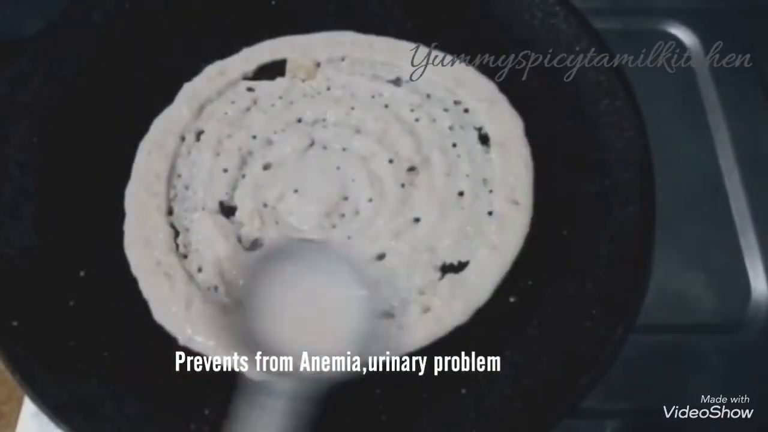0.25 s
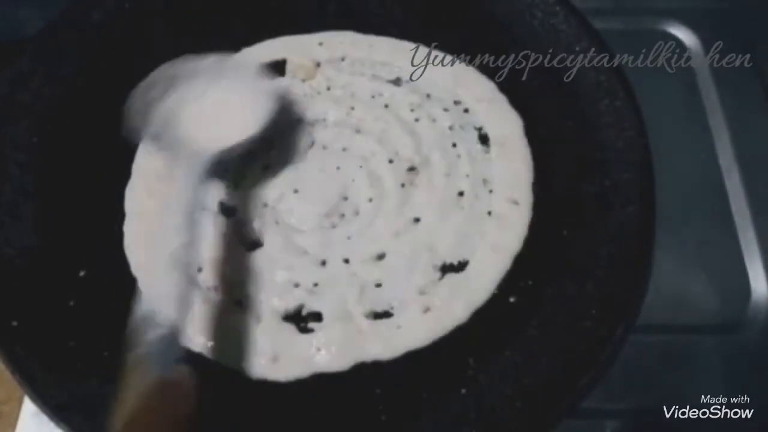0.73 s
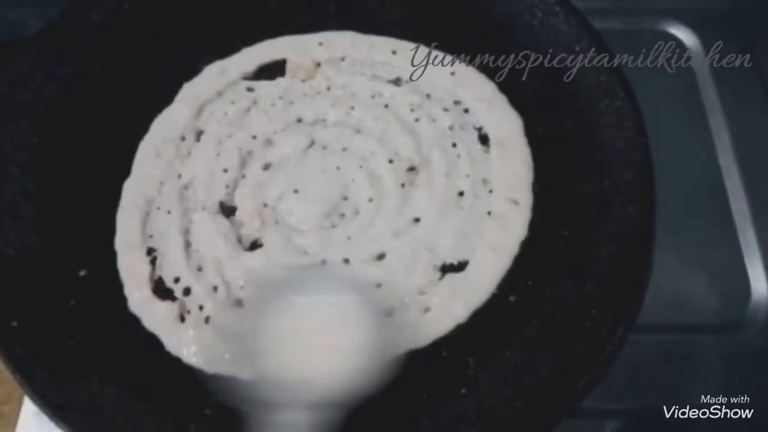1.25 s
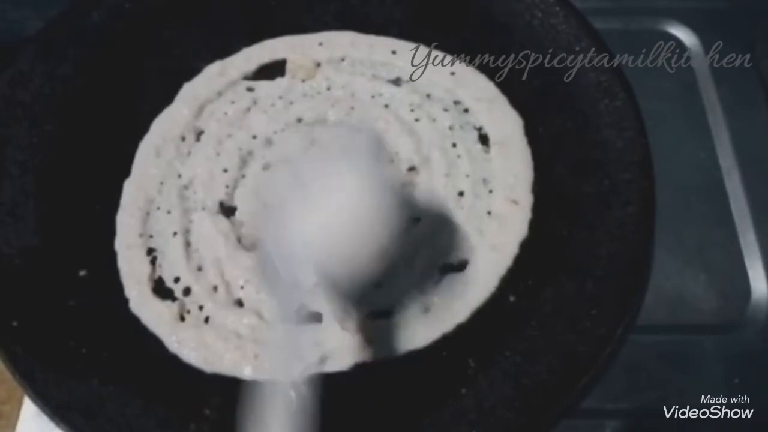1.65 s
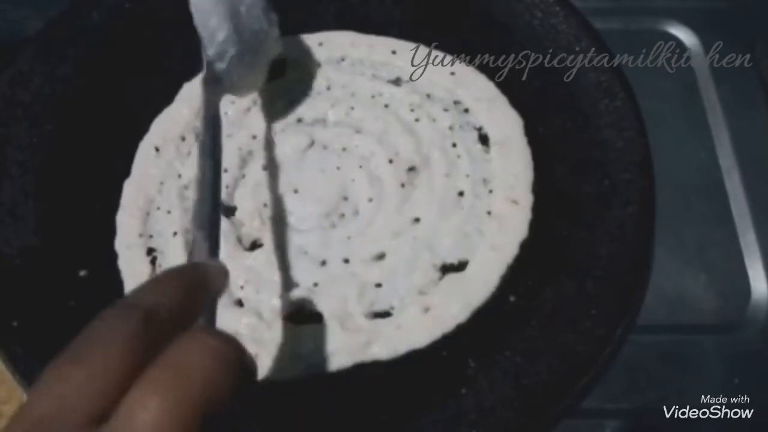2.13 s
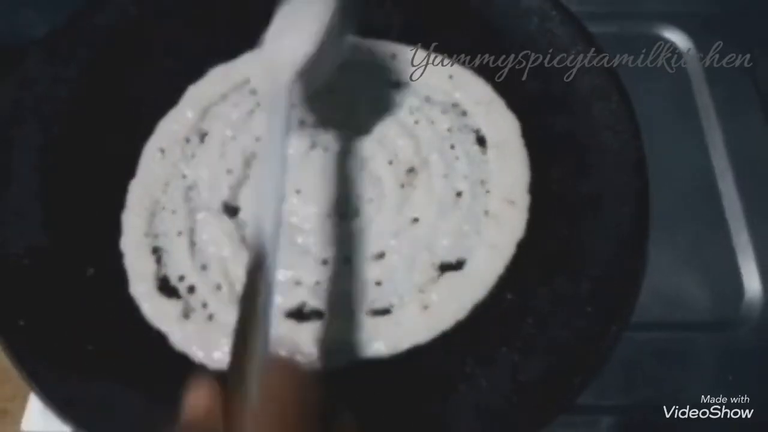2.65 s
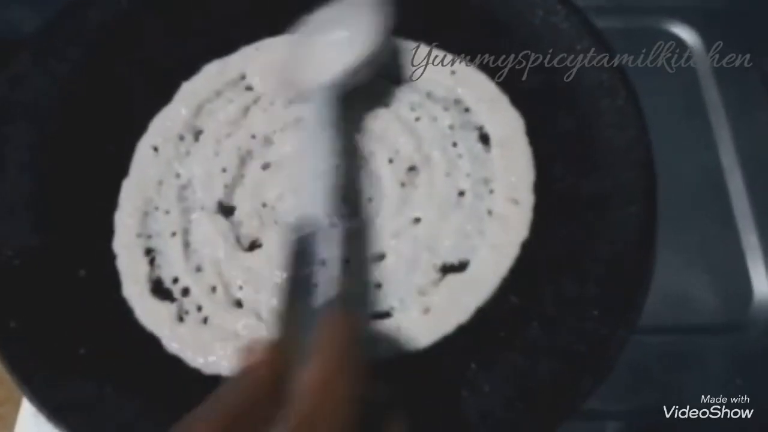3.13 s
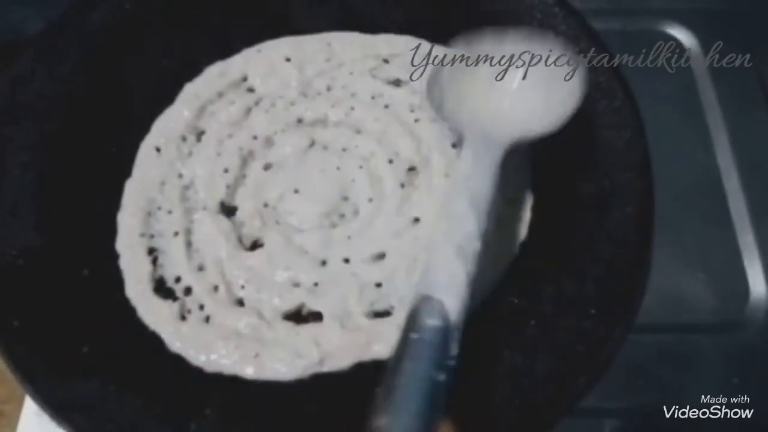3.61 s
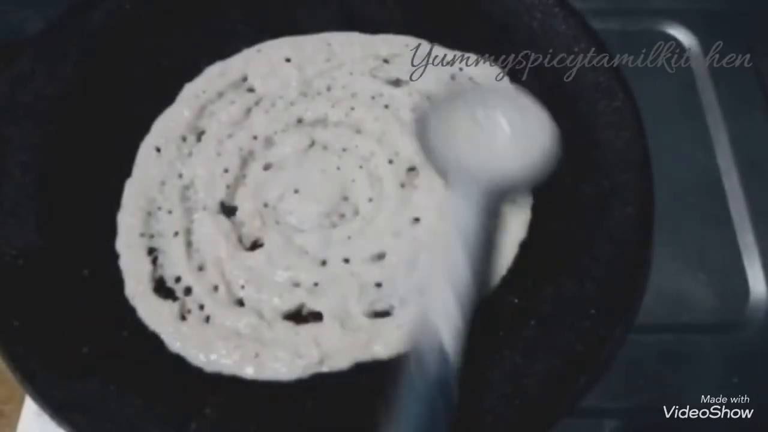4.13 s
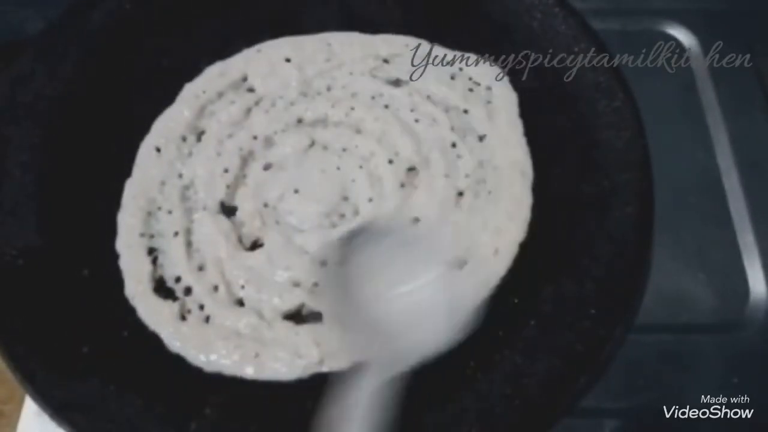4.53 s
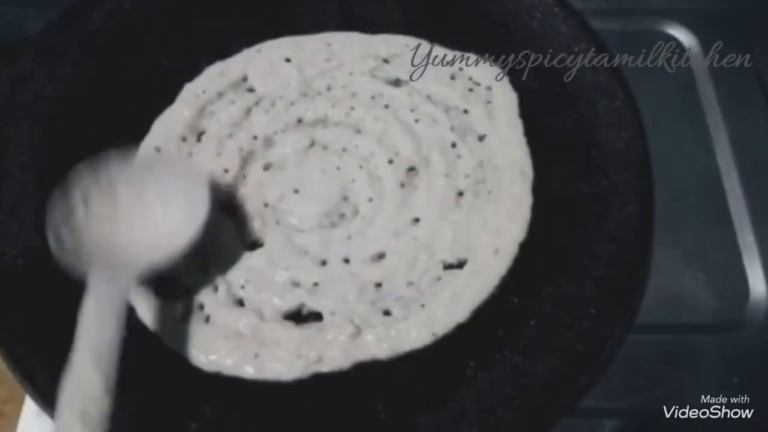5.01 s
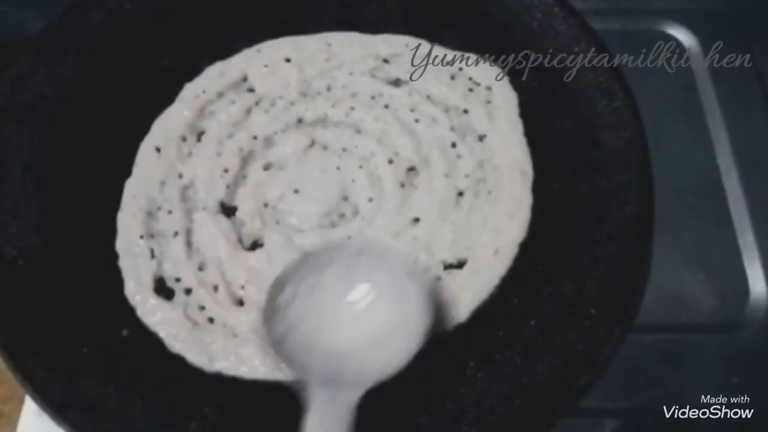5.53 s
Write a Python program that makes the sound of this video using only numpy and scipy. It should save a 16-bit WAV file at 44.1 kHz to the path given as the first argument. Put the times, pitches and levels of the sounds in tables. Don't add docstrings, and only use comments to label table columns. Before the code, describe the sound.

Close, steady sizzle of thin batter on a hot pan, crackling with sharp pops, gradually sinking, briefly revived near four seconds, then dying down.

```python
import sys
import numpy as np
from scipy import signal
from scipy.fft import rfft, irfft, next_fast_len
from scipy.io import wavfile

SR = 44100
rng = np.random.default_rng(int(sys.argv[2]) if len(sys.argv) > 2 else 0)


def store_pcm(level_fs):
    pcm = np.round(np.clip(level_fs, -1, 1) * 32767).astype(np.int16)
    wavfile.write(sys.argv[1], SR, np.atleast_2d(pcm).T)


def volts_from_db(level):
    exponent = np.asarray(level, float) / 20
    return 10 ** exponent


N = 254400
TIME = np.arange(N) / SR

# time in seconds, level in dB, fineness of the bubbles from -1 to 1.
SIZZLE = [(0, -36, -0.78), (.55, -35.5, -0.082), (1.2, -36.5, -0.085), (1.7, -39.5, -1.3), (2.0, -37, 0.75),
          (2.3, -39.5, -0.45), (2.9, -39.5, -0.76), (3.2, -41, -0.038), (3.6, -43, -0.66),
          (3.9, -45, -0.99), (4.15, -43.5, -0.57), (4.35, -39, 0.84), (4.7, -41.5, 0.0056), (5.05, -41, 1),
          (5.35, -42.5, -0.058), (5.74, -46.5, -0.87), (5.77, -54, -0.15)]
SIZE_HZ = [
    1300,
    2800,
    6000,
    12000,
]
SIZE_DB = [0.56, 0.7, 0, 0.75]
SIZE_FINE_DB = [-1.5, -3, 2, -3]
OIL_SIZE_DB = [-1.5, 1.6, 0.1, 0.5]
# middle in seconds, length in seconds, depth in dB.
LULLS = [(.291, .026, -2.5), (1.672, 0.047, -1.5), (1.928, 0.023, -3.5), (2.527, 0.013, -3.5),
         (2.864, 0.23, -3.5), (3.088, 0.036, -2.5), (3.397, 0.0066, -15.5), (3.456, 0.01, -12),
         (3.677, 0.1, -4.5), (3.91, 0.013, -6.5), (3.938, 0.0093, -19), (3.999, 0.051, -3.5),
         (4.089, 0.016, -7), (4.196, 0.021, -6), (4.817, 0.0066, -7), (4.922, 0.024, -4),
         (5.223, 0.016, -5), (5.245, 0.0072, -25), (5.322, 0.009, -10), (5.555, 0.01, -8),
         (5.642, 0.0089, -3)]
# middle in seconds, length in seconds, rise in dB.
SPURTS = [(0.161, 0.0049, 0), (0.646, 0.042, 1.5), (1.766, 0.023, 3.5), (2.0, 0.024, -1), (2.717, 0.04, 3),
          (3.207, 0.043, 2.1), (3.772, 0.036, 4.5), (3.964, 0.008, 7), (4.049, 0.026, 2.5),
          (4.44, 0.053, 1), (4.587, 0.013, 4.5), (4.709, 0.037, 3.5), (5.056, 0.047, 3),
          (5.491, 0.18, -0.5), (5.681, 0.13, 1.5), (5.737, 0.0068, 3)]
# middle in seconds, half length in seconds, pitch in Hz, width in Hz, boost in dB.
VENTS = [(0.04, .1, 3730, 400, 3), (.45, 0.058, 6000, 900, 5.5), (.65, 0.084, 6300, 900, 4.5),
         (1.303, 0.13, 6600, 400, 3.5), (1.8, 0.11, 6440, 400, 1), (2.198, 0.12, 6650, 400, 2),
         (1.127, 0.18, 4560, 400, 2.5), (1.276, 0.12, 2270, 400, 6), (1.38, 0.11, 3680, 300, 4),
         (1.497, 0.22, 9700, 500, 4), (1.6, 0.14, 10400, 500, 2), (1.58, .12, 7800, 400, 0),
         (1.993, .07, 5460, 1780, 5.5), (2.283, 0.08, 2830, 300, 5.5), (2.693, 0.13, 2900, 300, 4),
         (3.207, 0.19, 6700, 400, 4.5), (3.643, 0.11, 1140, 400, 7), (3.898, 0.1, 8400, 500, 6),
         (4.484, 0.18, 3270, 250, 5), (4.854, 0.36, 3270, 250, 5.5), (4.65, 0.37, 2230, 450, 4.5),
         (5.556, 0.16, 3550, 300, 5)]
# time in seconds, peak in dB, pitch in Hz.
POPS = [(0.156, -18, 7100), (0.161, -21, 4000), (0.7352, -22.5, 6500), (1.1697, -33, 6290),
        (1.4661, -20.5, 3680), (1.6202, -20.5, 5950), (1.9699, -21, 5360), (2.0232, -21, 5250),
        (2.791, -21.5, 5450), (2.8125, -20.5, 5590), (2.8539, -21, 6400), (3.3246, -23, 5980),
        (3.371, -24, 4880), (3.4072, -23, 3980), (3.5975, -19.5, 6510), (3.6463, -21.5, 4540),
        (3.7525, -22, 6670), (3.782, -26, 1470), (3.8052, -25, 5870), (3.9579, -28, 4120),
        (4.0238, -27, 7190), (4.0423, -24, 3370), (4.2206, -23, 6040), (4.5136, -22, 3260),
        (4.9541, -25.5, 5800), (4.9935, -26, 3270), (5.0424, -21.5, 6240), (5.1602, -21, 6540),
        (5.2065, -20.5, 5920), (5.666, -26, 2500)]
# frequency in Hz, level in dB per Hz.
COLOUR = [(180, -25), (300, -21), (500, -13), (700, -8.5), (850, -10.5), (1230, -10.5), (1400, -4),
          (1950, -4), (2400, -2.5), (4000, -2.5), (6600, 0), (8000, -9.5), (12900, -14)]
# frequency in Hz, width in Hz, boost in dB.
PAN_MODES = [(840, 26, 5), (945, 20, 8.5), (1310, 80, 2), (3680, 190, 0.5), (5300, 47, 0)]
# frequency in Hz, gain in dB.
MIC_PORT = [(12900, 0), (13150, -2.5), (13950, -2.5), (14700, 5), (15800, 4)]
# frequency in Hz, level in dB per Hz.
RUMBLE = [(12, -34), (20, -2), (59, -4.5), (103, 1.5), (172, -1), (203, -1), (349, -5.5), (513, -5),
          (600, 0.5), (780, -39), (1320, -120)]
# start in seconds, length in seconds, level in dB.
FLUTTERS = [(0.016, .07, -66), (.16, 0.11, -61), (.41, .055, -78), (0.764, 0.25, -75), (1.24, .1, -65),
            (1.37, .1, -64), (1.5, .1, -64), (1.825, .045, -74), (2.06, .045, -65.5), (2.17, 0.082, -63),
            (2.675, .04, -68), (2.32, .1, -65), (2.5, .1, -63), (2.835, .09, -62), (3.483, 0.11, -66),
            (3.7, .064, -64), (4.163, 0.045, -70), (4.353, .056, -64), (4.57, .08, -60),
            (5.073, 0.072, -64), (5.26, 0.11, -63), (5.473, .05, -61), (5.698, .035, -67)]
# frequency in Hz, level in dB.
FLARE = [(150, -59), (520, -68)]
# frequency in Hz, level in dB rms.
HUM = [(200, -78.5)]


def boil(per_s=2600, spread_db=2.5, clump_db=0.5, size_clump_db=2.0, hiss_db=-3.0, count=22):
    shared_db = clump_db * wander(166)
    oiled = np.clip((TIME - 4.22) / 0.098, 0, 1)
    fineness = curve(SIZZLE, 2)
    shares_db = np.array([db + fine_db * fineness + oil_db * oiled
                          for db, fine_db, oil_db in zip(SIZE_DB, SIZE_FINE_DB, OIL_SIZE_DB)])
    sunk_db = curve(SIZZLE, 1) - SIZZLE[0][1]
    busy = volts_from_db(1.2 * sunk_db)
    hiss = volts_from_db(hiss_db + 0.26 * sunk_db)
    out = np.zeros(N)
    for pitch_hz in np.geomspace(500, 20000, count):
        when, size = rng.random((2, N))
        strength = volts_from_db(spread_db * np.minimum(-np.log(size + 1e-9), 4.2))
        clicks = evened(strength * (when < busy * per_s / count / SR) / np.sqrt(busy))
        nearness = np.exp(-(np.log2(pitch_hz / np.array(SIZE_HZ)) / 0.9) ** 2)
        surge = volts_from_db(shared_db + size_clump_db * wander(37) + nearness @ shares_db)
        pulse = burst(pitch_hz, 11.0, 0.3)
        ringing = echoed(pulse, rng.standard_normal(3000), -2.0, -9.5, 0.13)
        out += signal.oaconvolve(clicks * surge, ringing)[:N]
        out += signal.oaconvolve(hiss * rng.standard_normal(N) * surge, pulse)[:N]
    return volts_from_db(sizzle_db()) * evened(out)


def vents(x, small_db=5, small_s=.06, small_width=.025, count=320):
    place, pitch = rng.random((count, 2)).T
    small = [(s, small_s, hz, small_width * hz, small_db)
             for s, hz in zip(place * N / SR, 900 * 16 ** pitch)]
    out = x.copy()
    for s, length, hz, width, db in VENTS + small:
        span = slice(max(round((s - length) * SR), 0), round((s + length) * SR))
        opening = np.cos(np.pi / 2 * (TIME[span] - s) / length) ** 2
        ring = signal.lfilter(*signal.iirpeak(hz, hz / width, SR), x[span])
        out[span] += (volts_from_db(db) - 1) * opening * ring
    return out


def pops(spray_s=0.0029, spray_db=-19.5, count=50):
    out = np.zeros(N + 8192)
    t = np.arange(2000) / SR
    level_db = sizzle_db() + 11
    low_hz, high_hz = 2500, 7000
    small = []
    for place, loudness, pitch in rng.random((count, 3)):
        s = .01 + 5.7 * place
        db = level_db[int(s * SR)] + 2 * loudness - 1
        small.append((s, db, low_hz * (high_hz / low_hz) ** pitch))
    chance = rng.standard_normal((len(POPS + small), 3, len(t)))
    for (s, db, pitch_hz), (size, gate, room) in zip(POPS + small, chance):
        drive = volts_from_db(spray_db) * abs(size) * (gate > 1.5) * np.exp(-t / spray_s)
        drive[0] = 1
        pop = signal.fftconvolve(drive, echoed(burst(pitch_hz, 4.2, 0.2), room, -4.5, -4.5, 0.11))
        at = round((s - .0004) * SR)
        out[at:at + len(pop)] += volts_from_db(db + 1.5) * pop / abs(pop).max()
    return out[:N]


def steady_hiss():
    return volts_from_db(-60.0) * evened(signal.oaconvolve(rng.standard_normal(N), burst(9000, 12.0, 1.0))[:N])


def burner(rumble_db=-62, fade_db_per_s=-1.04, drone_rest_db=-84.5, end_fade_s=.04):
    hz = np.fft.rfftfreq(N, 1 / SR)
    noise = rfft(rng.standard_normal((2, N)))
    rumble = irfft(noise[0] * volts_from_db(read(RUMBLE, hz)) / (1 + (hz / 600) ** 6), N)
    drone = irfft(noise[1] / (1 + ((hz - 103) / 8) ** 2), N)
    swells = sum(volts_from_db(db - 2.0) * np.exp(-(2 * (TIME - s) / length - 1) ** 2) for s, length, db in FLUTTERS)
    steady_drone = np.sqrt(2) * drone / abs(signal.hilbert(drone))
    flutter = volts_from_db(drone_rest_db) * evened(drone) + swells * steady_drone
    flare = sum(volts_from_db(db) * np.sin(2 * np.pi * f * TIME) for f, db in FLARE)
    flare = flare * np.exp(-((TIME - 2.04) / .07) ** 2)
    hum = sum(volts_from_db(db) * np.sqrt(2) * np.sin(2 * np.pi * f * TIME) for f, db in HUM)
    flame = volts_from_db(rumble_db + fade_db_per_s * TIME) * evened(rumble) + flutter + hum + flare
    return flame * np.clip((N / SR - TIME) / end_fade_s, .3, 1)


def burst(pitch_hz, ring_db, octaves):
    hz = np.fft.rfftfreq(4096, 1 / SR)
    pan_db = sum(d / (1 + (2 * (hz - f) / w) ** 2) for f, w, d in PAN_MODES)
    db = read(COLOUR, hz) + read(MIC_PORT, hz) + pan_db
    db = db + ring_db * np.exp(-.5 * (np.log2((hz + 1) / pitch_hz) / octaves) ** 2)
    return shaped(np.maximum(db, -60))


def shaped(db, causal=.3, twist=-1.05, lead=48):
    log_gain = np.log(volts_from_db(np.r_[db, db[-2:0:-1]]))
    phase = -causal * signal.hilbert(log_gain).imag[:len(db)] + twist
    return np.roll(irfft(volts_from_db(db) * np.exp(1j * phase)), lead)[:len(db) // 2]


def echoed(pulse, chance, tear_db, tail_db, t60):
    t = np.arange(len(chance)) / SR
    taps = chance * volts_from_db(-60 * t / t60) * (t > .0016)
    taps *= volts_from_db(tail_db) / np.linalg.norm(taps)
    taps[0] = volts_from_db(tear_db)
    burst_s = .0008 + .0001 * np.clip(chance[1], -2, 2)
    taps[round(burst_s * SR)] = 1
    return signal.fftconvolve(pulse, taps / np.linalg.norm(taps))


def sizzle_db():
    return curve(SIZZLE, 1) + bumps(LULLS) + bumps(SPURTS)


def bumps(rows, break_share=0.9):
    total = np.zeros(N)
    for s, length, db in rows:
        side = np.where(db * (TIME - s) < 0, break_share, 2 - break_share)
        total += db * np.exp(-.5 * (2 * (TIME - s) / length / side) ** 2)
    return total


def wander(per_s, count=32):
    steps = next_fast_len(N // count + 1)
    hz = np.fft.rfftfreq(steps, count / SR)
    tilt = (hz > 7) / np.sqrt((hz + 1) * (1 + (hz / per_s) ** 4))
    drift = irfft(rfft(rng.standard_normal(steps)) * tilt, steps)
    return np.interp(np.arange(N) / count, np.arange(steps), evened(drift))


def evened(x):
    return x / np.sqrt(np.mean(x ** 2) + 1e-20)


def curve(rows, column):
    rows = np.array(rows)
    return np.interp(TIME, rows[:, 0], rows[:, column])


def read(points, hz):
    f, value = np.transpose(points)
    return np.interp(np.log(hz + 1), np.log(f + 1), value)


def scene():
    floor = steady_hiss()
    pan = vents(boil()) + pops() + floor
    kitchen = echoed([1.], rng.standard_normal(4000), -40, -19, .1)
    direct = 35
    return (signal.oaconvolve(pan, kitchen)[direct:N + direct] + burner())[None]


def band_limit(x):
    return signal.sosfilt(signal.butter(12, 17090, fs=SR, output="sos"), x)


def record(dry):
    edge = signal.firwin(1023, 15745, window=("kaiser", 10), fs=SR)
    return band_limit(signal.oaconvolve(dry, edge[None], "same"))


dry = scene()
out = record(dry)
store_pcm(out)
```